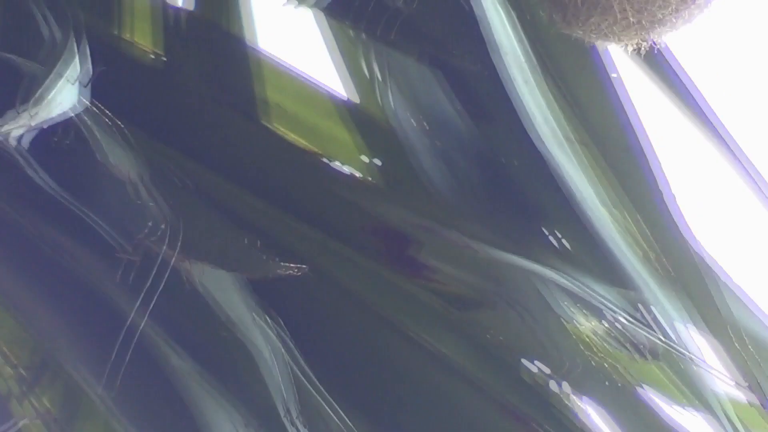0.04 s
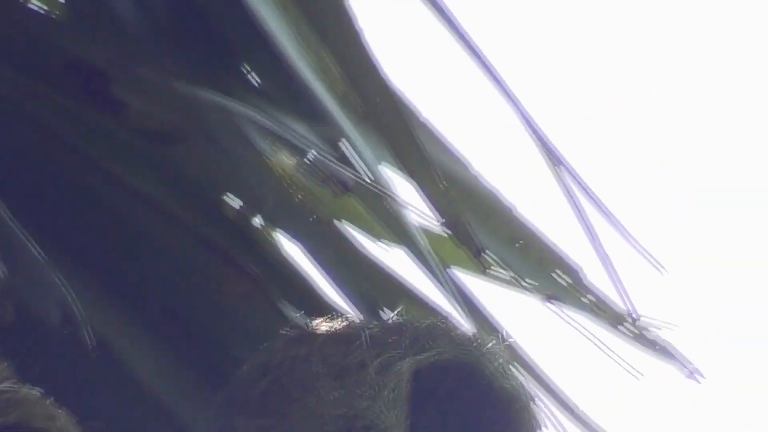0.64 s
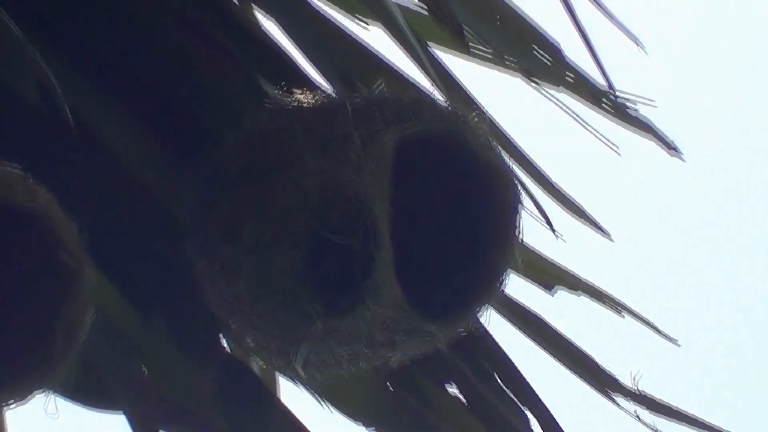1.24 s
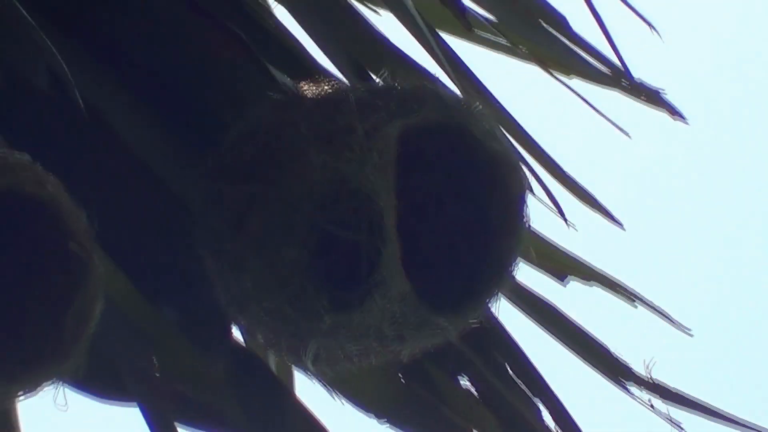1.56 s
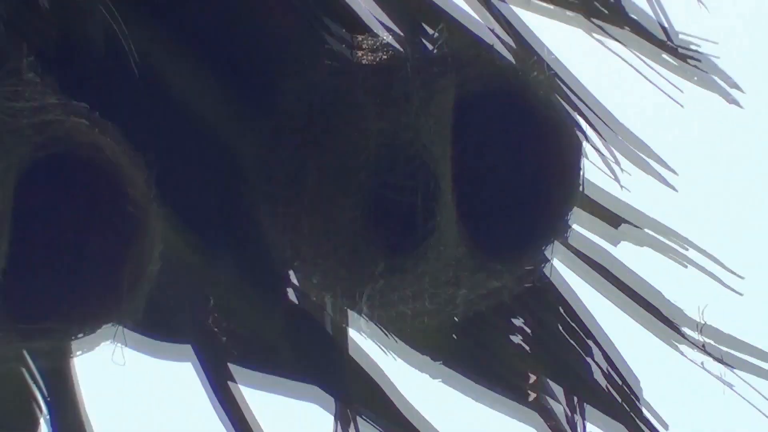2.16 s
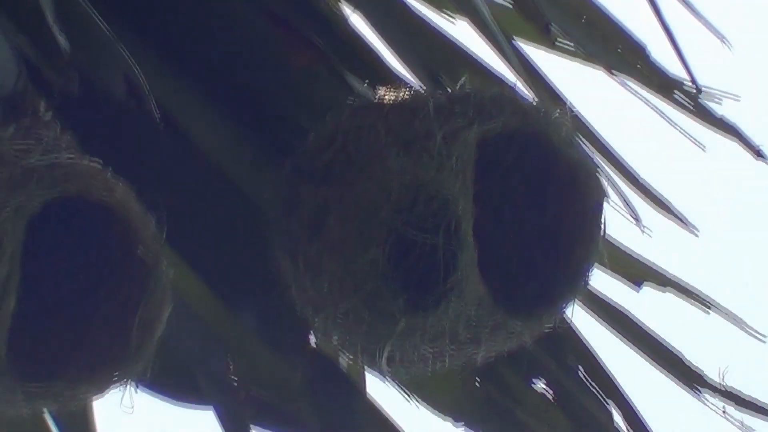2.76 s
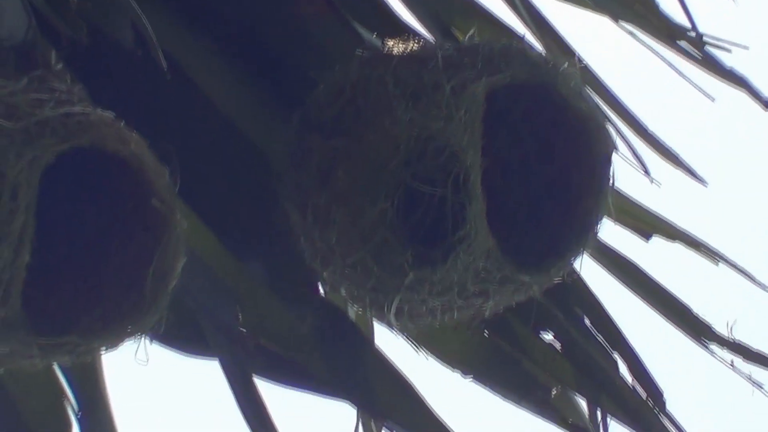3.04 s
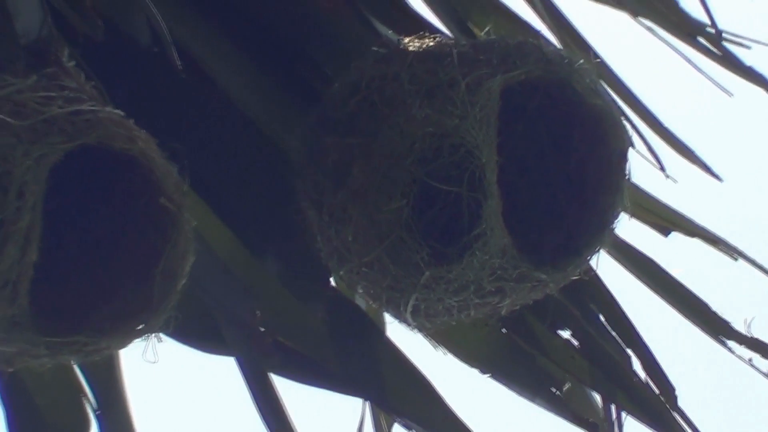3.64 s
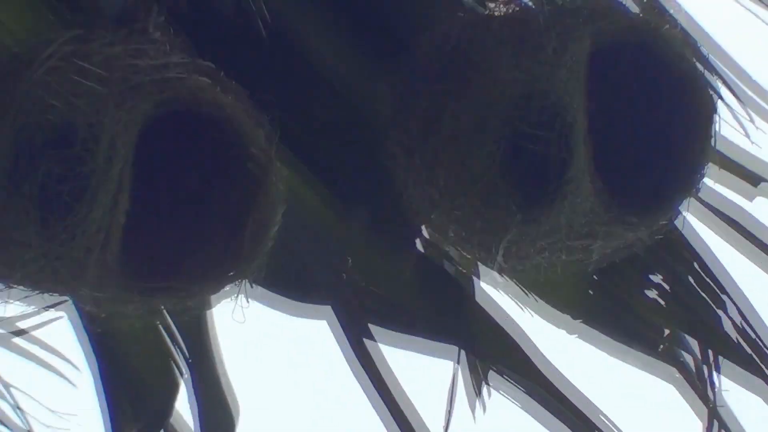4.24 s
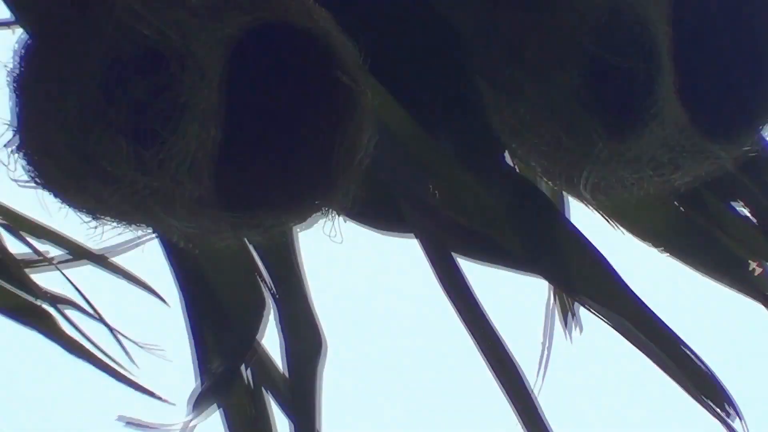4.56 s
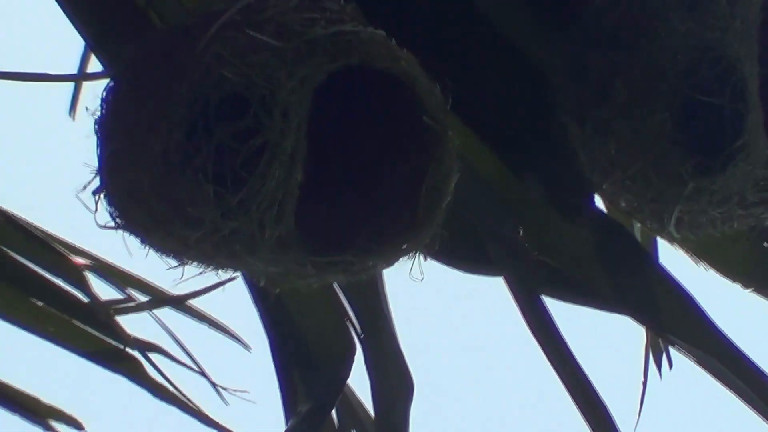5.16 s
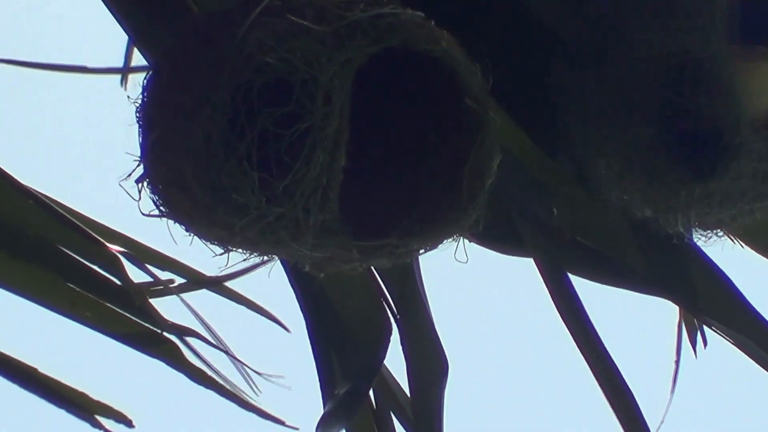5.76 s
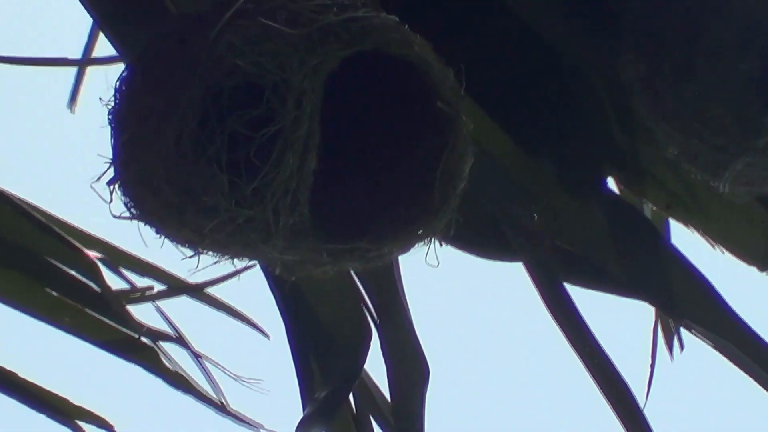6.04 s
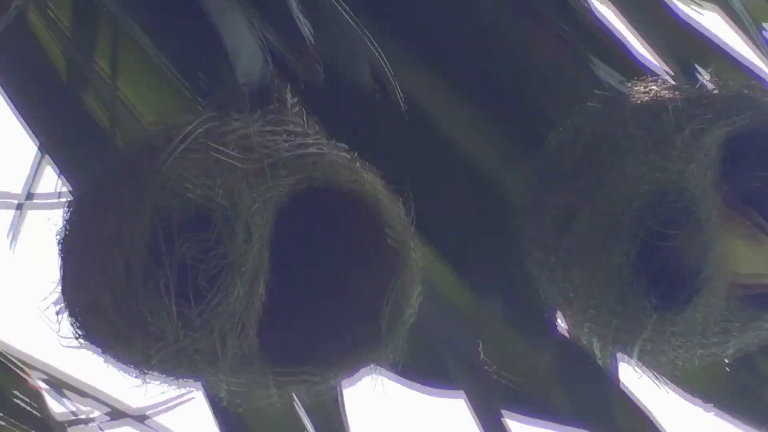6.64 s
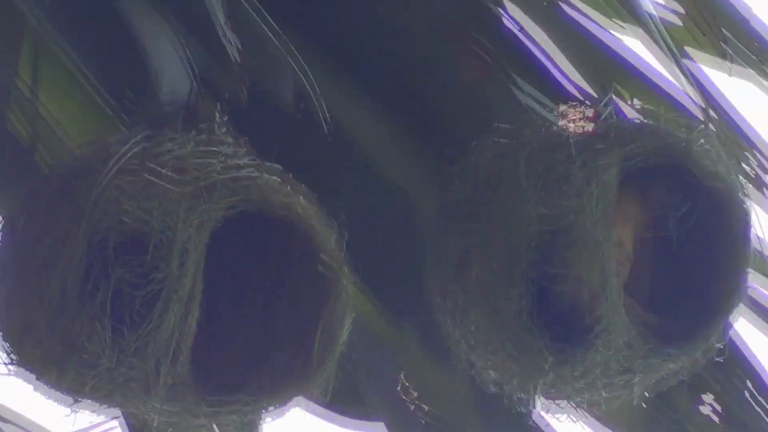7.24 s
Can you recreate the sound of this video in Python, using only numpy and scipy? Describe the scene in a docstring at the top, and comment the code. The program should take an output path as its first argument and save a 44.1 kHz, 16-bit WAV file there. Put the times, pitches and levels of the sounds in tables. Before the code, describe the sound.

Outdoors, wind buffets the microphone with an uneven low rumble and soft thumps. Small birds chirp in the distance over a faint insect drone. After a few dry ticks in the palm fronds, about five seconds in, a weaver bird close by gives four quick, harsh notes, each ending in a rasp. The wind then dies down.

```python
"""Under a palm hung with weaver nests. Wind buffets the microphone, insects drone, small birds chirp far off.
After a few dry ticks in the fronds a weaver close by gives four harsh notes: the tone of its
syrinx swoops twice, then tears into a rasp of turbulent air. Leaves and trunks scatter the calls.
The camera adds a thin, very high whine."""
import sys
import numpy as np
from scipy import signal
from scipy.fft import rfft, irfft, next_fast_len
from scipy.io import wavfile
from scipy.ndimage import uniform_filter1d, map_coordinates

SR = 44100
rng = np.random.default_rng(int(sys.argv[2]) if len(sys.argv) > 2 else 0)


def master(y):
    """Save y as 16-bit WAV."""
    cut = np.clip(np.atleast_2d(y).T, -1, 1)
    pcm = np.round(cut * 32767)  # scale
    wavfile.write(sys.argv[1], SR, pcm.astype(np.int16))


N = 321489
TIME_S = np.arange(N) / SR


def from_db(db):
    return 10 ** (np.asarray(db) / 20)


def unit_rms(x):
    return x / np.sqrt(np.mean(x ** 2) + 1e-20)


def curves(rows, t=TIME_S):
    """Table columns, interpolated linearly in time."""
    times_s, *columns = np.transpose(rows)
    return [np.interp(t, times_s, column) for column in columns]


def at_hz(points, hz):
    """Table lookup on a log-frequency axis."""
    points_hz, values = np.transpose(points)
    return np.interp(np.log(np.maximum(hz, 1)), np.log(points_hz), values)


def colour(x, spectrum):
    """Filter by a (frequency [Hz], gain [dB]) curve."""
    size = next_fast_len(x.shape[-1])
    hz = np.arange(size // 2 + 1) * SR / size
    return irfft(rfft(x, size) * from_db(at_hz(spectrum, hz)), size)[..., :x.shape[-1]]


def band(x, low_hz, high_hz):
    return signal.sosfilt(signal.butter(2, [low_hz, high_hz], "band", fs=SR, output="sos"), x)


def drift(rate_hz, size=N):
    """Smooth random curve, spread about 1."""
    knots = rng.standard_normal(int(size / SR * 2 * rate_hz) + 4)
    return map_coordinates(knots, [np.arange(size) / SR * rate_hz + 1], order=2, mode="nearest")


def add(track, start_s, sound):
    start = max(round(start_s * SR), 0)
    track[start:start + len(sound)] += sound[:N - start]


# Left-right likeness of the microphone capsules: (frequency [Hz], correlation [-1..1])
CAPSULE_LIKENESS = [(60, 1), (130, 0.43), (290, -0.27), (640, -0.56), (1400, -0.46), (3100, 0.55),
                    (6800, 0.13), (11000, 0.91), (15000, 1)]

def capsule_noise(spectrum, lumpy_db):
    """Lumpy noise on two capsules: sum is mid (rms 1), difference a quarter cycle late is side."""
    size = next_fast_len(N)
    hz = np.arange(size // 2 + 1) * SR / size
    alike = np.clip(at_hz(CAPSULE_LIKENESS, hz), -.95, .99)
    width = np.sqrt((1 - alike) / (1 + alike))
    lumps = from_db(lumpy_db * np.array([drift(45, size), drift(45, size)]))
    lumps /= np.sqrt(uniform_filter1d(np.mean(lumps ** 2, axis=0), int(.036 * SR)))
    a, b = rfft(rng.standard_normal((2, size)) * lumps) * from_db(at_hz(spectrum, hz))
    mid, side = irfft(np.array([a + b, -1j * (a - b) * width]), size)[:, :N]
    return (mid + side * [[1], [-1]]) / np.std(mid)


# Wind strength: (time [s], level [dB])
WIND_STRENGTH = [(0.0, -32), (0.08, -24.5), (0.49, -49.5), (0.77, -48), (0.81, -39.5), (1.1, -37),
                 (1.13, -31), (1.99, -27.5), (2.25, -31), (2.62, -26), (2.9, -35.5), (3.19, -30),
                 (4.93, -32), (5.32, -40.5), (5.46, -25), (5.62, -36.5), (5.89, -30), (6.23, -45),
                 (6.52, -39.5), (7.29, -59.5)]
# Gusts: (crest time [s], length [s], rumble lift [dB], flutter lift [dB])
WIND_GUSTS = [(0.05, 0.075, 2, 4), (0.215, 0.13, 3, 6), (0.375, 0.049, 6, 12), (1.182, 0.057, 6, 0),
              (1.28, 0.037, 3.5, 6), (1.47, 0.083, 5.5, 3), (1.613, 0.16, 3, 8.5), (1.78, 0.046, 4, 6),
              (1.967, .1, 4, 7.5), (2.5, .1, 0, 7.5), (2.768, .05, 3, 3), (3.222, 0.066, 5, -1),
              (3.471, 0.036, 6.5, 14.5), (3.638, 0.034, 1, 9), (4.273, .12, 4.5, 2), (4.744, 0.063, 2, 7),
              (4.915, 0.072, 3, 9)]
# Wind spectra: (frequency [Hz], relative density [dB])
RUMBLE_SPECTRUM = [(14, -39), (25, -21), (40, -4.5), (60, 2), (105, 3), (150, -2), (210, -6), (400, -28.5),
                   (800, -57)]
FLUTTER_SPECTRUM = [(120, -11), (190, 1.5), (260, 3.5), (400, -6.5), (600, -13.5), (900, -23.5),
                    (1500, -41.5), (2500, -57)]

def wind():
    """Air churns on the microphone: bass rumble, and a flutter that grows faster as the wind rises."""
    breeze_db, breeze_flutter_db, flutter_db_per_db = -29.5, -43.5, 1.58
    wind_db = curves(WIND_STRENGTH)[0]
    rumble_db = wind_db - .5
    flutter_db = breeze_flutter_db + flutter_db_per_db * (wind_db - breeze_db)
    for crest_s, length_s, rumble_lift_db, flutter_lift_db in WIND_GUSTS:
        swell = np.exp(-(2 * (TIME_S - crest_s) / length_s) ** 2)
        rumble_db += rumble_lift_db * swell
        flutter_db += flutter_lift_db * swell
    rumble = capsule_noise(RUMBLE_SPECTRUM, lumpy_db=5)
    rumble /= np.sqrt(uniform_filter1d(rumble.mean(0) ** 2, int(.06 * SR)) + .011)   # even out over 60 ms
    rumble *= from_db(2 * drift(22))
    flutter = capsule_noise(FLUTTER_SPECTRUM, lumpy_db=9) * from_db(2.94 * drift(140))
    return from_db(rumble_db) * rumble + from_db(flutter_db) * flutter


# Eddy hits: (centre time [s], level [dB], length [s])
EDDY_HITS = [(0.034, -21.5, 0.021), (0.181, -22, 0.019), (1.199, -21, .04), (1.283, -22, 0.028),
             (1.461, -17, 0.029), (1.506, -18, 0.023), (1.7, -17, 0.019), (1.817, -27, 0.016),
             (1.964, -19.5, 0.017), (2.026, -19.5, 0.022), (2.05, -19, 0.018), (2.126, -21.5, 0.02),
             (2.455, -22.5, 0.014), (2.623, -18.5, 0.012), (3.467, -20, 0.023), (5.452, -20.5, 0.023),
             (5.87, -29.5, 0.02)]

def eddies():
    """Single eddies push, then pull on the microphone, harder on the left."""
    out = np.zeros(N)
    for centre_s, level_db, length_s in EDDY_HITS:
        u = np.linspace(-8, 8, int(length_s * SR))
        push_pull = -3 * u / (1 + 2 * u * u) ** 1.83 * np.hanning(len(u))
        add(out, centre_s - length_s / 2, from_db(level_db) * push_pull)
    return out * from_db([[2], [-7]])


# Open-air spectrum: (frequency [Hz], relative density [dB])
AIR_SPECTRUM = [(25, 15.5), (55, 7), (110, 2), (250, -3.5), (500, -2.5), (1000, -8), (2400, -9.5),
                (3800, -13), (5200, -13), (7000, -13.5), (9000, -15.5), (15000, -17.5)]

def air(treble_db=-60.5):
    """Steady open-air hiss, scaled by its treble band."""
    hiss = capsule_noise(AIR_SPECTRUM, lumpy_db=2)
    return from_db(treble_db) * hiss / np.std(band(hiss.mean(0), 7670, 14670))


def chorus(hz, width_hz):
    """Many distant insects near one pitch merge into a narrow band."""
    r = np.exp(-np.pi * width_hz / SR)
    resonator = [1, -2 * r * np.cos(2 * np.pi * hz / SR), r * r]
    voices = rng.standard_normal((3, N))   # left, right, common
    for _ in range(2):
        voices = signal.lfilter([1 - r, 0, r - 1], resonator, voices)
    return unit_rms(voices[:2] + voices[2])


# Insect lulls: (start [s], end [s])
INSECT_LULLS = [(.6, 1.19), (4.9, 5.72)]

def insects(start_db=-59.5, fade_db_per_s=.6, lull_db=-9, lull_edge_s=.1):
    """Three droning bands; the main one fades slowly and sinks in each lull."""
    main_db = start_db - fade_db_per_s * TIME_S
    for start_s, end_s in INSECT_LULLS:
        inside_s = np.minimum(TIME_S - start_s, end_s - TIME_S)
        main_db += lull_db * np.clip(inside_s / lull_edge_s + .5, 0, 1)
    main = from_db(main_db + 2.1 * drift(10)) * chorus(hz=2542, width_hz=58)
    middle = from_db(-69.5 + 2 * drift(5.4)) * chorus(hz=3894, width_hz=77)
    high = from_db(-68 + 2 * drift(6.8)) * chorus(hz=6660, width_hz=750)
    return main + middle + high


def camera_whine(hz=15625, level_db=-60.5, dip_rate_hz=50):
    """The camera's thin tone, with fast regular dips in level."""
    dips = 1 - .9 * (TIME_S * dip_rate_hz % 1 < .2)
    tone = np.sqrt(2) * np.sin(2 * np.pi * hz * TIME_S)
    return band(from_db(level_db) * dips * tone, hz - 170, hz + 170)


def foliage(x, t60_s):
    """Dense scatter from leaves and trunks, different on each side."""
    t = np.arange(SR // 2) / SR
    scatter = rng.standard_normal((2, len(t))) * from_db(-60 * t / t60_s) * (1 - np.exp(-t / .00066))
    scatter /= np.sqrt(np.sum(scatter[0] ** 2))
    return signal.fftconvolve(x[None], scatter, axes=1)[:, :N]


def whistle(length_s, start_hz, middle_hz, end_hz, skew=.833):
    """Pure note on a pitch parabola; skew below 1 hurries the first half."""
    u = np.linspace(0, 1, int(length_s * SR))
    parabola = np.polyfit([0, .5, 1], [start_hz, middle_hz, end_hz], 2)
    hz = np.polyval(parabola, u ** skew)
    return np.sqrt(2) * np.sin(2 * np.pi * np.cumsum(hz) / SR) * np.sin(np.pi * u)


# Colony chatter: (time [s], level [dB])
COLONY_LEVEL = [(0, -63.5), (.6, -64), (.9, -71), (1.2, -63.5), (5.9, -68), (7.29, -61.5)]

def colony(slurs=600):
    """Far weavers chatter at random in short slurs that the trees smear together."""
    out = np.zeros(N)
    for when, length, height, slope, faintness in rng.random((slurs, 5)):
        hz = 3200 + 1300 * height
        slur = whistle(.004 + .008 * length, hz * (1.2 - .3 * slope), hz, hz * (.75 + .3 * slope))
        add(out, when * TIME_S[-1], from_db(-12 * faintness) * slur)
    return from_db(curves(COLONY_LEVEL)[0]) * unit_rms(.86 * out + foliage(out, t60_s=.14))


# High trills: (time [s], pips [count], relative level [dB])
TRILL_RUNS = [(0.004, 2, -56.5), (0.477, 3, -54.5), (0.915, 3, -59.5), (1.345, 3, -59.5), (1.843, 3, -59.5),
              (2.68, 3, -60), (3.87, 3, -68), (5.643, 2, -61), (6.29, 3, -67)]

def trills(pip_spacing_s=.031):
    """A far bird repeats runs of falling pips, the first softer, blurred by the trees."""
    out = np.zeros(N)
    for start_s, pips, level_db in TRILL_RUNS:
        for k in range(round(pips)):
            pip = whistle(length_s=.0184, start_hz=7350 * rng.normal(1, .0093), middle_hz=7000, end_hz=6140)
            pip_db = level_db - 2.1 * (k == 0) + rng.normal(0, 1)
            add(out, start_s + k * pip_spacing_s, from_db(pip_db) * pip)
    return from_db(5.5) * out + from_db(5) * foliage(out, t60_s=.26)


# Arched chirps: (time [s], length [s], top pitch [Hz], arch depth [Hz], level [dB])
CHIRP_ARCHES = [(0.105, 0.033, 4750, 300, -61), (0.383, .06, 4850, 280, -58),
                (1.562, .025, 3620, 60, -56.5), (1.577, 0.021, 5250, 650, -50),
                (1.592, .024, 5600, 1150, -44.5), (1.643, .022, 3630, 50, -59),
                (1.693, 0.03, 5600, 1150, -42.5), (1.734, 0.029, 5050, 650, -51),
                (1.808, 0.1, 5770, 1300, -44), (2.037, 0.036, 4700, 200, -60), (2.27, .06, 4520, 250, -60),
                (3.443, 0.017, 3690, 50, -52.5), (4.52, 0.027, 3650, 40, -54), (5.836, .014, 4650, 60, -57),
                (6.364, .025, 3620, 20, -55.5)]

def chirps():
    """Small birds in the trees; each chirp rises to its top and falls back."""
    out = np.zeros(N)
    for start_s, length_s, top_hz, depth_hz, level_db in CHIRP_ARCHES:
        foot_hz = top_hz - depth_hz
        add(out, start_s, from_db(level_db) * whistle(length_s, foot_hz, top_hz, foot_hz, skew=.81))
    return out + from_db(-11.5) * foliage(out, t60_s=.31)


# Leaf rustles: (time [s], decay [s], centre [Hz], level [dB])
LEAF_RUSTLES = [(0.38, .04, 7000, -58), (2.44, 0.083, 8900, -57.5), (3.021, 0.066, 8400, -57.5),
                (3.033, 0.015, 2600, -48.5), (4.339, .015, 1710, -50), (5.872, 0.02, 1870, -48),
                (5.872, 0.011, 8100, -47), (6.457, 0.016, 1700, -50)]

def rustles():
    """Leaves brush in short, decaying bursts of noise."""
    out = np.zeros(N)
    t = np.arange(SR // 3) / SR
    for start_s, decay_s, hz, level_db in LEAF_RUSTLES:
        brush = unit_rms(band(rng.standard_normal(len(t)), hz / 1.31, hz * 1.21))
        add(out, start_s, from_db(level_db) * brush * np.exp(-t / decay_s))
    return out + from_db(-5) * foliage(out, t60_s=.03)


# Frond ticks: (time [s], relative level [dB])
FROND_TICKS = [(0.382, -48), (4.135, -39.5), (4.141, -40.5), (4.304, -42.5), (4.3811, -37), (4.5114, -35.5),
               (4.602, -47), (4.643, -47), (5.870, -40)]
# Modes of a snap: (frequency [Hz], gain [dB], t60 [s])
SNAP_MODES = [(3900, -14, .005), (5600, 5, 0.0045), (6300, 5, 0.0017), (8100, 10, 0.0021),
              (9700, 2.5, 0.0027)]

def ticks(rebound_s=.0008):
    """Dry snaps among the fronds ring a few very short modes and rebound once."""
    out = np.zeros(N)
    t = np.arange(SR // 3) / SR
    for start_s, level_db in FROND_TICKS:
        snap = np.zeros(len(t))
        for hz, gain_db, t60_s in SNAP_MODES:
            cycles = hz * t * rng.normal(1, .033) + rng.random()
            snap += from_db(gain_db - 60 * t / t60_s) * np.sin(2 * np.pi * cycles)
        add(out, start_s, from_db(level_db) * snap)
        add(out, start_s + rebound_s, from_db(level_db - 5) * snap)
    out = band(out, 2300, 12000)
    return out + from_db(-5) * foliage(out, t60_s=.03)


def stutter(t, rate_hz=85):
    """Uneven sawtooth for pitch dives: quick rise, slower fall."""
    cycles = np.cumsum(rate_hz * np.exp(.35 * drift(120, len(t)))) / SR + rng.random()
    return signal.sawtooth(2 * np.pi * cycles, .25)


# Syrinx harmonics: (multiple [1], gain [dB])
SYRINX_HARMONICS = [(1, 0), (2, -12.5), (3, -18.5), (4, -25)]
# Throat response: (frequency [Hz], gain [dB])
THROAT_RESPONSE = [(1200, -22), (1900, -9), (2500, -9), (3200, -4.5), (4900, 1), (6200, -3), (7200, -6),
                   (8800, -3), (10300, 0.5), (11500, 4), (12400, -6), (13700, 3), (16000, -18)]

def syrinx_tone(t, phase, pitch_hz, overtone_db):
    """Slack membranes slap shut: overtones are richest at low pitch and at the attack."""
    rich_db = overtone_db - .5 + 14 * np.maximum(np.log2(3400 / pitch_hz), 0) + 7 * np.exp(-t / .021)
    source = sum(from_db(db + rich_db * (k > 1)) * np.sin(k * phase) for k, db in SYRINX_HARMONICS)
    # the other side of the syrinx beats against the voice, adding sidebands
    beat_hz = 850 + 200 * drift(90, len(t))
    beating = 1 + .3 * np.sin(2 * np.pi * np.cumsum(beat_hz) / SR)
    shimmer = from_db(2.2 * drift(400, len(t)))
    return np.sqrt(2) * colour(source * beating, THROAT_RESPONSE) * shimmer


# Rasp spectrum: (frequency [Hz], relative density [dB])
RASP_SPECTRUM = [(1300, -20.5), (1800, -7.5), (2300, 0), (3300, -2), (4100, -2.5), (5700, -7.5),
                 (6300, -15), (7000, -5.5), (8200, -15), (9300, -10), (11400, -9.5), (12300, -22),
                 (13800, -20), (15700, -32)]

def syrinx_hiss(phase):
    """Each opening of the membranes passes a puff of turbulent air."""
    puffs = (1 + .62 * np.sin(phase)) * from_db(2.4 * drift(699, len(phase)))
    return unit_rms(colour(rng.standard_normal(len(phase)) * puffs, RASP_SPECTRUM))


# Weaver notes: (time [s], length [s], pitch [ratio], stretch [ratio], voice [dB], rasp [dB],
# overtones [dB])
WEAVER_NOTES = [(4.967, 0.14, .95, 0.96, -37, -40, 0.5), (5.158, 0.14, 0.98, 1.07, -33, -36, -1.5),
                (5.349, 0.14, 1.005, 1.06, -30, -35, -1), (5.555, 0.091, 1.015, 1.03, -31, -38.5, 0)]
# Gesture of every note, before scaling: (time [s], pitch [Hz], effort [dB], rasp share [0..1])
NOTE_GESTURE = [(0, 2800, -11, .1), (.004, 3800, -4, .1), (.008, 4950, -1.5, .1), (.012, 3550, -1, .1),
                (.017, 3330, 2, .1), (.0225, 3550, 2.5, .15), (.026, 2700, -1, .2), (.032, 1900, -5, .2),
                (.034, 3300, -10, .7), (.038, 4450, -8, .3), (.042, 3380, 1, .15), (.050, 3270, 2.5, .1),
                (.057, 2950, 0, .15), (.066, 2250, -2.5, .25), (.072, 3000, -6, 1)]

def weaver(pitch_wander=.007):
    """The syrinx swoops twice, then stutters in quick dives as the tone tears into a rasp."""
    out = np.zeros(N)
    t = np.arange(SR // 5) / SR
    for start_s, length_s, pitch_ratio, stretch, voice_db, rasp_db, overtone_db in WEAVER_NOTES:
        pitch_hz, effort_db, rasp = curves(NOTE_GESTURE, t / stretch)
        dives = .25 * rasp ** 2 * stutter(t)
        jitter = (.014 + .06 * rasp ** 2) * drift(700, len(t))
        wander = pitch_wander * drift(59.5, len(t))
        phase = 2 * np.pi * np.cumsum(pitch_hz * pitch_ratio * np.exp(dives + jitter + wander)) / SR
        tone = syrinx_tone(t, phase, pitch_hz, overtone_db)
        hiss = syrinx_hiss(phase)
        breath = from_db(overtone_db - 8.5) * band(hiss, 3300, 16000)
        voiced = from_db(voice_db + effort_db) * (1 - rasp) * (tone + breath)
        torn = from_db(rasp_db) * rasp * (from_db(-1.5) * tone + from_db(-5) * hiss)
        attack = np.clip(t / .0012, 0, 1)
        release = np.exp(-np.maximum(t - length_s + .0059, 0) / .013)
        add(out, start_s, (voiced + torn) * attack * release)
    frond_echoes = sum(from_db(gain_db) * np.interp(TIME_S - delay_s, TIME_S, out)
                       for delay_s, gain_db in [(.0041, -13), (.0093, -11)])
    return out + frond_echoes + from_db(-11.5) * foliage(band(out, 1500, 6800), t60_s=.24)


def scene():
    bed = wind() + eddies() + air() + insects() + camera_whine()
    return bed + colony() + trills() + chirps() + rustles() + ticks() + weaver()


def record(dry):
    """Steep low-pass just above the whine."""
    cutoff_hz = 15750
    return signal.sosfilt(signal.ellip(12, .1, 80, cutoff_hz, fs=SR, output="sos"), dry)


dry = scene()
out = record(dry)
master(out)
```